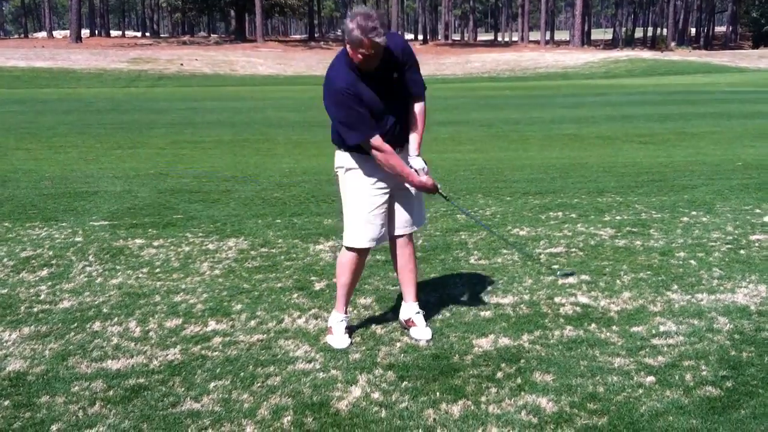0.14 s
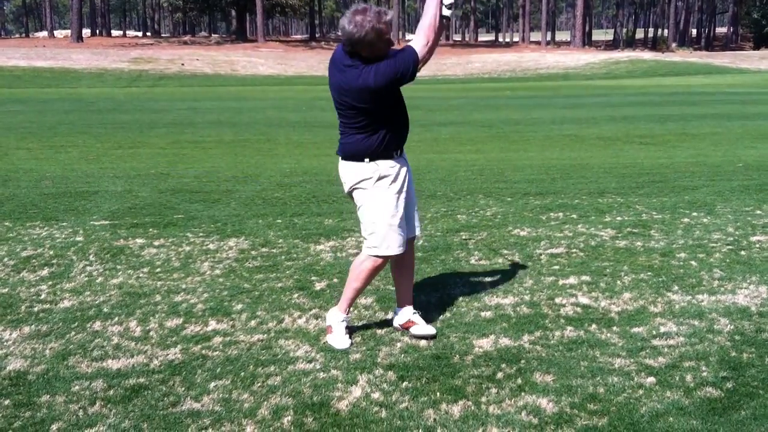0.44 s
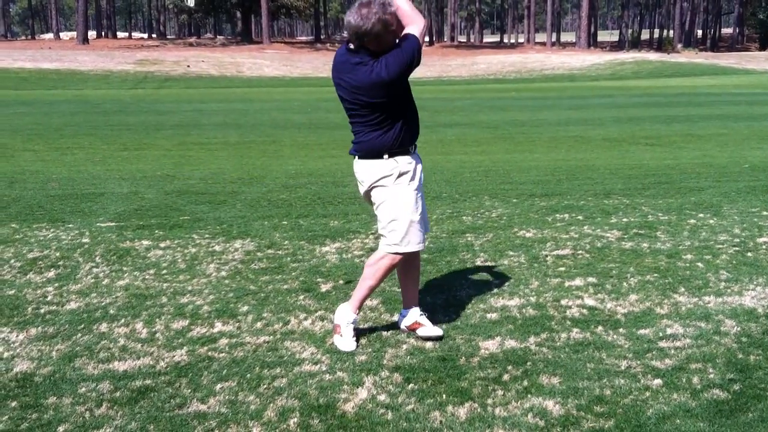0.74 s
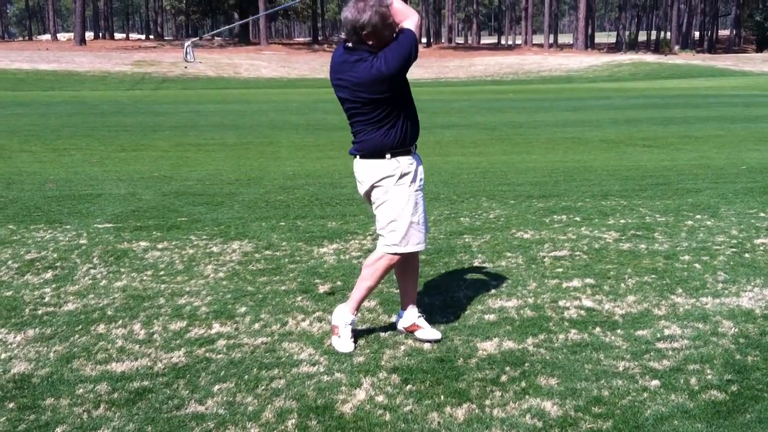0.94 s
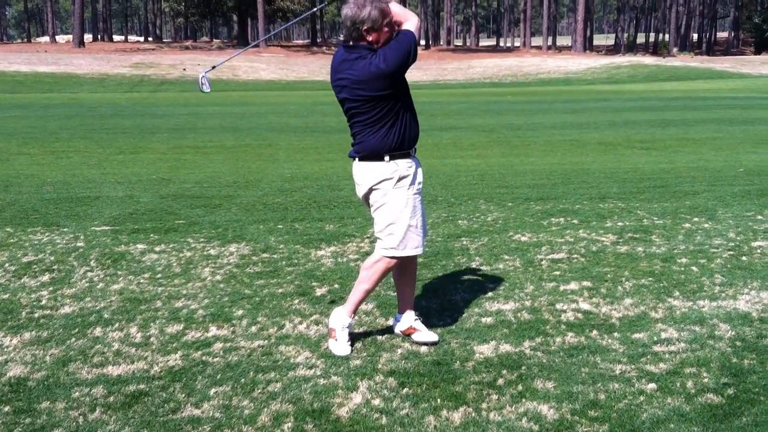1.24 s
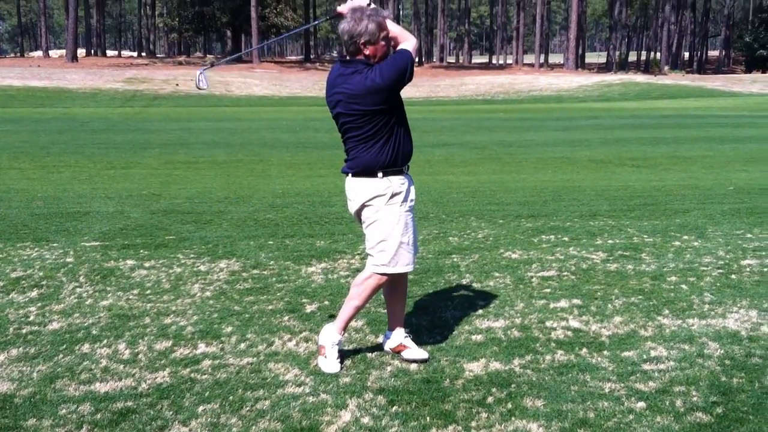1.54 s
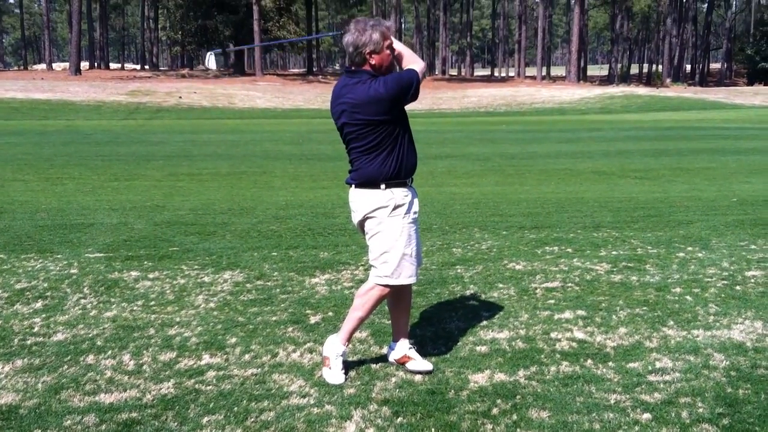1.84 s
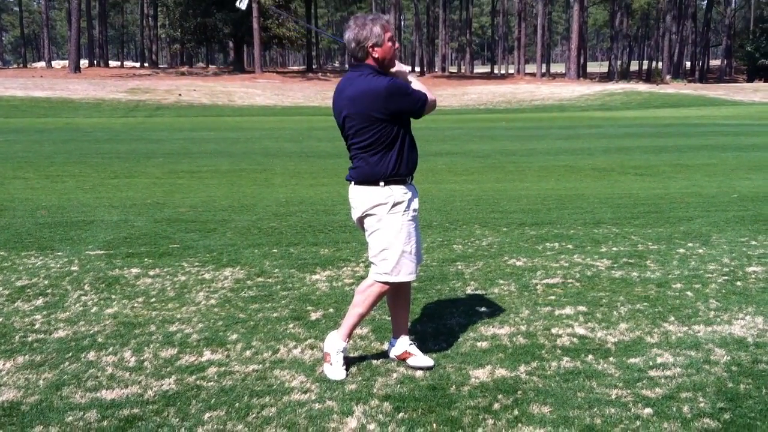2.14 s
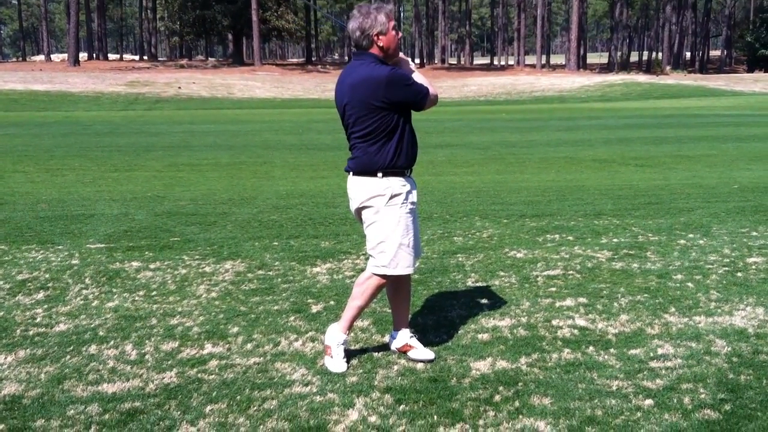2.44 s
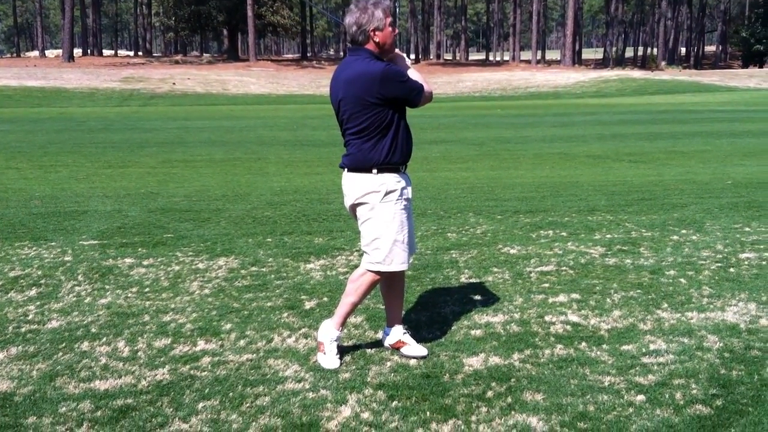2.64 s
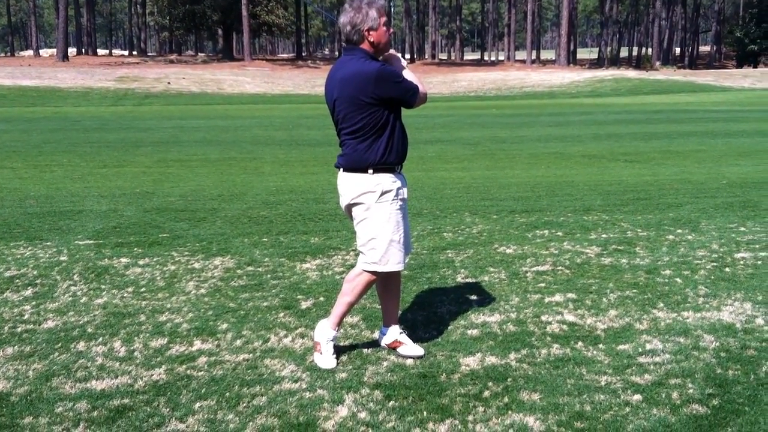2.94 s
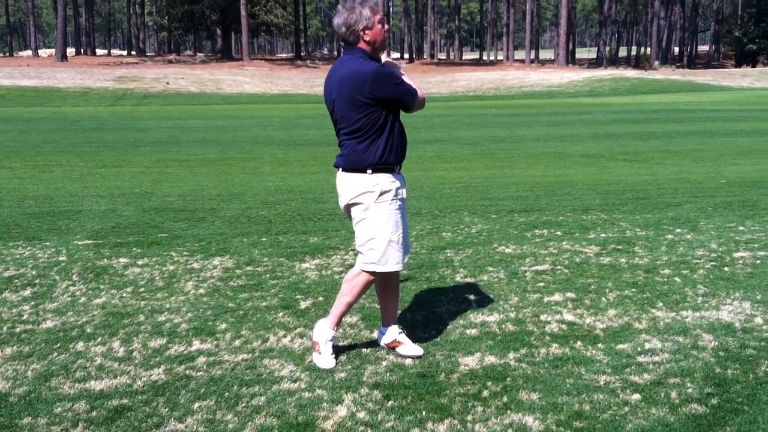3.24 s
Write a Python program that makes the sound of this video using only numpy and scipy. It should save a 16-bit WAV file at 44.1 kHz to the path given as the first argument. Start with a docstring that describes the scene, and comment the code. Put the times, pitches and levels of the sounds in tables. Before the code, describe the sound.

A golf iron swings with a quick rising swish and hits the ball with one sharp click at about 0.2 seconds, briefly ripping the turf. A faint steel ring and patter of dirt follow until about 0.6 seconds. Wind buffets the microphone in low, uneven thumps to the end, near 3.4 seconds. Behind it are a soft hush of trees and very faint, distant bird calls.

```python
"""An iron strikes a golf ball on an open fairway: a rising swish, then one hard click of ball and face.
The club tears the turf, the steel head rings faintly, and thrown turf and sand patter down.
Wind eddies thump on the bare microphone throughout, each a short low pulse that sags in pitch.
Far behind sit thin bird calls and the hush of pines."""
import sys
import numpy as np
from scipy import signal
from scipy.fft import rfft, irfft
from scipy.io import wavfile

SR = 44100
rng = np.random.default_rng(int(sys.argv[2]) if len(sys.argv) > 2 else 0)


def to_wav(s):
    """Save 16-bit WAV."""
    ch = np.atleast_2d(s).T  # columns
    pcm = np.round(np.clip(ch, -1, 1) * 32767)  # PCM
    wavfile.write(sys.argv[1], SR, pcm.astype(np.int16))


N = 149940

# the click, modes of ball and club face: (frequency [Hz], level [dB], t60 [s])
IMPACT_MODES = [(450, -27, .02), (1410, -12, .007), (2100, 0, .0055), (2600, -7, .005), (5085, -22, .02),
                (6480, -8, .0042), (10500, -19, .006)]
# early reflections off ground and body: (delay [s], level [dB])
REFLECTIONS = [(.003, -17), (.0047, -20), (.0073, -16.5)]
# tone of the tearing turf: (frequency [Hz], relative level [dB])
TURF_COLOUR = [(500, -15), (1000, -15), (1400, -6.5), (2100, -5.5), (3800, -13.5), (5000, -11.5),
               (6600, -2.5), (8200, -13.5), (10500, -10.5), (15000, -33)]
# downswing: (time [s], whistle pitch [Hz], whistle level [dB], hiss level [dB])
SWING = [(0.04, 258.4, -80, -75), (0.08, 311.5, -59, -71), (0.11, 400, -50.5, -59.5),
         (0.13, 405, -51, -51.5), (0.15, 452, -43, -54), (0.175, 477, -45.5, -56), (0.195, 473, -62.5, -59),
         (0.26, 378, -77.5, -61), (0.31, 330, -87, -62)]
# tone of the air hiss: (frequency [Hz], relative level [dB])
SWISH_COLOUR = [(900, -6), (1400, -4), (1850, 3), (2600, -1), (4000, -9), (8000, -24), (11500, -31),
                (14000, -48)]
# ring of the steel head: (time [s], lowest mode level [dB], upper mode level [dB])
HEAD_RING = [(.21, -80, -90), (.245, -71, -90), (.26, -59, -90), (.28, -84, -96), (.38, -93, -90),
             (.40, -92, -79), (.45, -90, -73), (.49, -80, -81), (.53, -92, -87), (.58, -99, -99)]
# turf and sand landing: (time [s], level [dB], half-width [s])
PATTERS = [(0.233, -70, 0.011), (0.254, -71, 0.0086), (0.331, -63, 0.0079), (.463, -69, 0.0054),
           (0.488, -65, 0.012), (0.524, -78, .012), (2.534, -74.5, .005)]
# bright tone of the debris: (frequency [Hz], relative level [dB])
PATTER_COLOUR = [(3000, -16.5), (5500, 2.5), (9000, -5), (12000, -13), (15500, -19)]
# the strongest wind thumps: (time [s], peak level [dB], pitch [Hz], half-width [ms])
EDDIES = [(0.294, -16, 340.2, 1.6), (0.305, -29, 192, 6.9), (0.332, -30, 209.6, 4.6),
          (0.438, -40.5, 271, 14.4), (0.453, -25.5, 192, 3), (0.462, -27, 206, 6),
          (0.572, -22.5, 245.6, 4.2), (0.579, -27.5, 241.5, 9.8), (0.592, -22, 210.5, 4.1),
          (0.646, -30, 245.5, 2.3), (0.676, -27.5, 147, 3.7), (0.867, -22.5, 196.7, 5.1),
          (0.881, -19, 220.8, 2.55), (0.942, -23.5, 215, 6.6), (0.963, -30, 194.6, 4.5),
          (1.0, -29, 225, 8.5), (1.042, -24.5, 209.6, 12.3), (1.051, -22.5, 212.2, 2.6),
          (1.077, -27, 250.5, 9.5), (1.083, -18, 193, 1.9), (1.094, -23.5, 192.5, 7.9),
          (1.16, -25.5, 261, 4.6), (1.175, -28, 176.4, 6.8), (1.197, -31, 169, 8.3),
          (1.204, -30, 243, 2.14), (1.218, -31, 188, 4.2), (1.272, -31, 262, 4.8), (1.325, -28, 165.5, 7.8),
          (1.337, -23, 264, 3.45), (1.347, -18, 258.8, 1.23), (1.358, -15.5, 159, 9.7),
          (1.376, -21, 265, 5.9), (1.398, -29, 226, 4.5), (1.408, -27.5, 350, 10.1),
          (1.416, -19.5, 231.3, 1.8), (1.43, -33, 239.3, 5.5), (1.473, -27.5, 224, 7.7),
          (1.48, -26.5, 186.7, 5.5), (1.552, -29, 196.8, 7.1), (1.702, -22, 225, 6.5),
          (1.73, -29.5, 262.3, 6), (1.75, -23.5, 168.2, 6.5), (1.836, -28.5, 197.3, 5.2),
          (1.929, -21.5, 257, 3), (1.943, -24.5, 226.4, 10.6), (1.951, -18, 247.5, 1.7),
          (2.097, -35, 191.2, 5.4), (2.12, -30.5, 197.6, 6.9), (2.207, -32.5, 198, 6.9),
          (2.227, -27, 198, 3), (2.234, -21, 254.3, 3.9), (2.242, -21, 214, 12.2), (2.262, -28, 214, 2.5),
          (2.276, -31, 190, 6.6), (2.288, -42, 205, 3), (2.309, -24.5, 274, 3), (2.324, -28, 172, 8.4),
          (2.342, -21, 165.5, 3.5), (2.361, -19.5, 177.5, 10.3), (2.402, -28, 193.6, 1.9),
          (2.42, -38.5, 179, 16.5), (2.461, -28, 194, 6.8), (2.497, -35, 173.8, 7),
          (2.511, -20.5, 179.3, 5.4), (2.518, -20, 256.5, 3.4), (2.525, -31.5, 173, 6.6),
          (2.583, -19.5, 248.8, 3.2), (2.594, -27, 222, 2.4), (2.604, -29.5, 219.5, 4.5),
          (2.613, -26.5, 211, 9), (2.637, -31, 179.3, 12.3), (2.692, -28, 250, 3.7),
          (2.732, -24.5, 200.4, 2.5), (2.741, -24.5, 252.6, 7.7), (2.838, -26, 277.4, 2.6),
          (2.858, -24.5, 197.6, 4.1), (2.882, -16, 249.4, 5.3), (2.908, -33.5, 284, 17.5),
          (2.931, -20.5, 227.3, 3), (2.96, -32.5, 254.5, 10.3), (2.983, -32, 203, 6.4),
          (2.997, -25.5, 237.5, 4.2), (3.008, -27, 201.6, 5.9), (3.082, -34, 243.2, 19.5),
          (3.103, -28.5, 195.6, 8.4), (3.115, -22, 211.4, 2.9), (3.128, -21.5, 212.4, 3.6)]
# sharp flicks at an eddy's leading edge: (time [s], peak level [dB])
FLICKS = [(0.293, -24.5), (0.44, -32), (0.571, -28.5), (0.58, -29.5), (0.59, -36), (0.805, -35),
          (0.644, -39), (0.939, -33), (1.042, -36), (1.076, -32), (1.087, -34), (1.098, -42),
          (1.159, -37.5), (1.321, -36), (1.335, -31.5), (1.349, -32), (1.373, -27.5), (1.406, -30),
          (1.468, -25.5), (1.7, -25.5), (1.746, -33), (1.911, -35.5), (1.927, -33), (1.939, -26),
          (1.951, -38), (2.233, -31), (2.349, -31.5), (2.361, -30.5), (2.58, -27), (2.879, -38),
          (3.083, -37), (3.115, -29.5), (3.125, -34)]
# gusts, riding the bed of small eddies: (time [s], level [dB])
GUSTS = [(0.0, -50.5), (0.37, -50), (1.04, -40), (1.28, -44.5), (1.56, -49), (2.04, -48.5), (2.43, -43.5),
         (2.54, -43), (2.68, -52), (2.99, -44), (3.13, -49.5), (3.4, -51.5)]
# falling bird call: (time [s], pitch [Hz], level [dB])
BIRD_CALL = [(.605, 6850, -91), (.625, 6800, -85), (.645, 6620, -79), (.71, 6570, -80), (.725, 6200, -80),
             (.74, 5400, -79), (.765, 5000, -83), (.81, 4700, -84), (.86, 4600, -72), (.875, 4600, -83.5)]
# far-off bird notes: (time [s], half-width [s], pitch [Hz], level [dB])
FAR_NOTES = [(1.01, .065, 3480, -82), (1.02, .065, 4240, -84), (1.14, .02, 3500, -79),
             (1.57, .08, 3480, -82), (1.8, .05, 3020, -76), (2.75, 0.089, 2830, -78), (3.0, .07, 2850, -76)]
# tone of the pines: (frequency [Hz], relative level [dB])
HUSH_COLOUR = [(60, 2), (200, -10.5), (500, -7), (900, -8), (1500, -10), (1900, -15.5), (2900, -22.5),
               (4000, -25.5), (7000, -35), (11000, -41), (13000, -51), (15500, -66.5)]
# swell of the hush around 2-3.5 kHz: (time [s], level [dB])
HUSH_SWELL = [(0.0, -89), (0.8, -74), (1.5, -70.5), (2.2, -67.5), (2.6, -68.5), (3.1, -73), (3.4, -72)]
# faint distant hums: (frequency [Hz], bandwidth [Hz], level over the swell [dB])
HUMS = [(1536, 88, 1.5), (2830, 100, -9)]

STRIKE_S, IMPACT_RISE_S = 0.1812, .0003
TURF_DB, TURF_RISE_S, TURF_BODY_T60_S, TURF_TREBLE_T60_S = -18.5, .0015, 0.061, 0.029
HEAD_HZ, HEAD_TOP_DB, HEAD_WAVER_HZ = (5432, 9055, 12700, 15300), -17, 35
SPRAY_DB, SPRAY_T60_S, GRIT_DB = -65, 0.81, 2.5
SMALL_PER_S, SMALL_SPREAD_DB, SMALL_HZ, SMALL_OCTAVES, SMALL_CYCLES = 220, 3, 209.64, 0.9, 1.3
FLICK_HZ, FLICK_MS, FLICK_OCTAVES = 540, 2.9, 0.3027
BIRD_WAVER = .005   # share of pitch
HUSH_DB = -57
LOW_CUT_HZ, HIGH_CUT_HZ = 88, 15950


def strike():
    """One blow rings ball and face; close reflections thicken the click."""
    click = np.zeros(N)
    click[int(STRIKE_S * SR)] = -1
    modes = sum(amp(db) * ring(click, hz, t60) for hz, db, t60 in IMPACT_MODES)
    impact = modes * (1 - np.exp(-(since_strike() / IMPACT_RISE_S) ** 2))
    return impact + sum(amp(db) * np.roll(impact, int(delay * SR)) for delay, db in REFLECTIONS)


def turf_tear():
    """The club rips the turf in a short rasp whose top end dies first."""
    t = since_strike()
    rasp = coloured(TURF_COLOUR)
    body = signal.sosfiltfilt(signal.butter(2, 4000, fs=SR, output="sos"), rasp)
    treble = rasp - body
    attack = 1 - np.exp(-(t / TURF_RISE_S) ** 2)
    tail = body * amp(-60 * t / TURF_BODY_T60_S) + treble * amp(-60 * t / TURF_TREBLE_T60_S)
    return amp(TURF_DB) * attack * tail


def swing():
    """The shaft sheds a rough whistle that climbs with speed; the head hisses through the air."""
    hz, whistle_db, hiss_db = automation(SWING)
    whistle = amp(whistle_db) * wavering(hz, share=0.076) * drift(45)
    hiss = amp(hiss_db + 1.6 * drift(39.5)) * coloured(SWISH_COLOUR)
    return gate(SWING) * (whistle + hiss)


def head_ring():
    """Four faint steel modes shimmer as the head turns through the follow-through."""
    low_db, upper_db = automation(HEAD_RING)
    levels = low_db, upper_db, upper_db + HEAD_TOP_DB, upper_db + HEAD_TOP_DB
    return gate(HEAD_RING) * sum(amp(db + 7 * drift(30.1)) * wavering(hz, HEAD_WAVER_HZ / hz)
                                 for hz, db in zip(HEAD_HZ, levels))


def debris():
    """Thrown turf and sand land in bright, grainy patters over a thinning spray."""
    t = np.arange(N) / SR
    patters = sum(amp(db) * np.exp(-.5 * ((t - s) / width) ** 2) for s, db, width in PATTERS)
    spray = (t > STRIKE_S) * amp(SPRAY_DB - 60 * since_strike() / SPRAY_T60_S)
    return (patters + spray) * coloured(PATTER_COLOUR) * amp(GRIT_DB * drift(500))


def wind():
    """Wind buffets the microphone: big thumps, sharp flicks and a gusting bed of small eddies."""
    chance, size, tone = rng.random((N // 100, 3)).T   # one chance of an eddy every 100 samples
    born = chance < SMALL_PER_S * 100 / SR
    times = np.flatnonzero(born) * 100 / SR
    levels = -SMALL_SPREAD_DB * np.log(size[born] + .01)
    hz = SMALL_HZ * 2 ** (SMALL_OCTAVES * 2 * (tone[born] - .5))
    bed = rms_one(thumps(np.transpose([times, levels, hz, 1000 * SMALL_CYCLES / hz])))
    flick_rows = [(s, db, FLICK_HZ * 2 ** (FLICK_OCTAVES * (rng.random() - .5)), FLICK_MS)
                  for s, db in FLICKS]
    flicks = thumps(flick_rows, sag_octaves=.6, rise_share=.42)
    return thumps(EDDIES) + flicks + amp(automation(GUSTS)[0]) * bed


def thumps(rows, sag_octaves=.3, rise_share=.7):
    """Each eddy is a brief swell of pressure, quick to rise, whose pitch sags as it passes."""
    out, t = np.zeros(N + SR), np.arange(-2000, 2000) / SR
    for (s, db, hz, ms), (phase, detune) in zip(rows, rng.random((len(rows), 2))):
        age = t / (ms / 1000)   # half-widths from the peak
        envelope = np.exp(-2 * (age / np.where(age < 0, rise_share, 1)) ** 2)
        pitch = hz * 2 ** (-sag_octaves * np.clip(age, -2, 2) + .1 * (detune - .5))
        tone = np.sin(2 * np.pi * (phase + np.cumsum(pitch) / SR))
        start = int(s * SR)
        out[start:start + len(t)] += amp(db) * envelope * tone
    return out[2000:N + 2000]


def birds():
    """One thin whistle slides down in pitch; a few held notes flutter further off."""
    t = np.arange(N) / SR
    far = np.zeros(N)
    for s, width, hz, db in FAR_NOTES:
        envelope = amp(db) * np.exp(-.5 * ((t - s) / width) ** 4)
        far += envelope * wavering(hz, BIRD_WAVER / 2) * drift(35)
    flutter = amp(2 * drift(36))
    hz, db = automation(BIRD_CALL)
    call = gate(BIRD_CALL) * amp(db) * wavering(hz, BIRD_WAVER) * (.9 + .25 * drift(40))
    return flutter * (call + far)


def pines():
    """A soft bed of distant trees, with swelling upper mids and two wavering hums."""
    swell_db = automation(HUSH_SWELL)[0]
    out = amp(HUSH_DB + .7 * drift(1.1)) * coloured(HUSH_COLOUR)
    out += amp(swell_db) * coloured([(2100, -1.0), (3100, -6.0), (3800, -35.5)])
    for hz, width_hz, db in HUMS:
        gain = amp(swell_db + db + 1.84 * drift(3.7))
        out += gain * rms_one(ring(rng.standard_normal(N), hz, t60=2.2 / width_hz))
    return out


def amp(db):
    return 10 ** (np.asarray(db) / 20)


def rms_one(x):
    return x / np.sqrt(np.mean(x ** 2) + 1e-20)


def since_strike():
    """Seconds since the blow, zero before it."""
    return np.maximum(np.arange(N) - int(STRIKE_S * SR), 0) / SR


def automation(rows):
    """One curve through the breakpoints for each column after time."""
    times, *columns = np.transpose(rows)
    return [np.interp(np.arange(N) / SR, times, column) for column in columns]


def gate(rows):
    """Open from the first breakpoint to the last."""
    t = np.arange(N) / SR
    return (t > rows[0][0]) & (t < rows[-1][0])


def coloured(points):
    """Noise of rms 1 shaped by an EQ curve, rolled off below its first point."""
    hz, db = np.transpose(points)
    f = np.maximum(np.arange(N // 2 + 1) * SR / N, 1)
    gain = amp(np.interp(np.log(f), np.log(hz), db)) * np.minimum(1, f / hz[0]) ** 2
    return rms_one(irfft(rfft(rng.standard_normal(N)) * gain, N))


def drift(rate_hz):
    """Smooth random modulation of rms 1."""
    r = np.exp(-2 * np.pi * rate_hz / SR)
    return rms_one(signal.lfilter([1], [1, -2 * r, r * r], rng.standard_normal(N + SR))[SR:])


def ring(drive, hz, t60):
    """A resonator: a unit click sets a decaying sine ringing."""
    r, w = amp(-60 / (t60 * SR)), 2 * np.pi * hz / SR
    return signal.lfilter([0, np.sin(w)], [1, -2 * r * np.cos(w), r * r], drive + 1e-18)


def wavering(hz, share):
    """A sine of rms 1 whose pitch wanders quickly."""
    pitch = hz * (1 + share * drift(59.76))
    return np.sqrt(2) * np.sin(2 * np.pi * np.cumsum(pitch) / SR)


def scene():
    """Mono mix of the fairway ambience and the shot."""
    return (wind() + pines() + swing() + strike() + turf_tear() + head_ring() + debris() + birds())[None]


def record(dry):
    """The small microphone drops the deep bass; the very top is cut."""
    x = signal.sosfilt(signal.butter(3, LOW_CUT_HZ, "high", fs=SR, output="sos"), dry)
    return signal.sosfilt(signal.cheby2(12, 60, HIGH_CUT_HZ, fs=SR, output="sos"), x)


dry = scene()
out = record(dry)
to_wav(out)
```